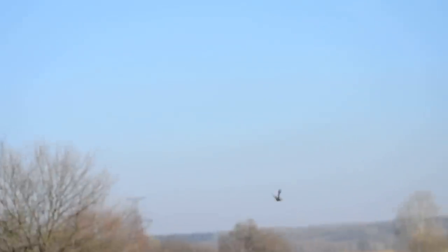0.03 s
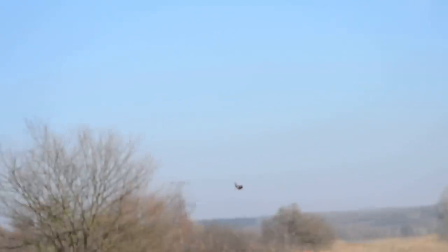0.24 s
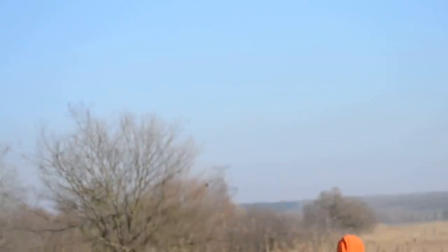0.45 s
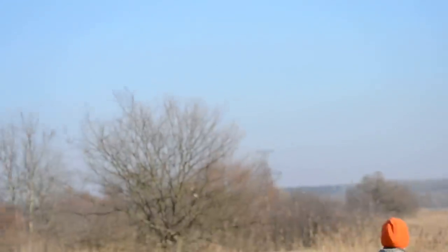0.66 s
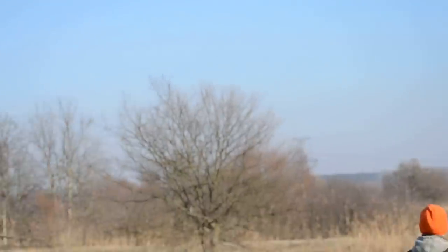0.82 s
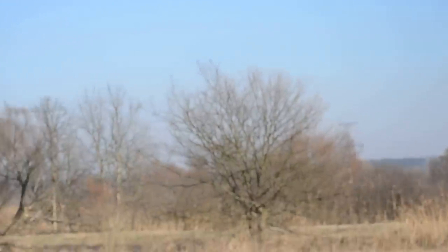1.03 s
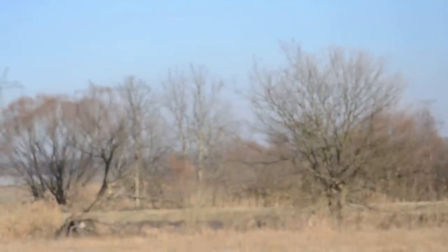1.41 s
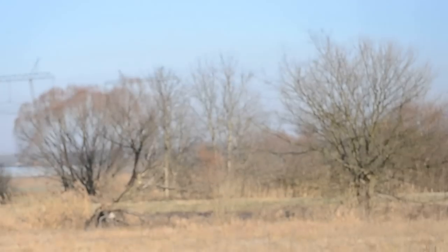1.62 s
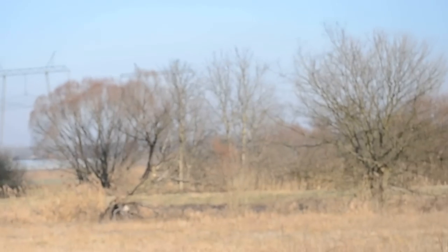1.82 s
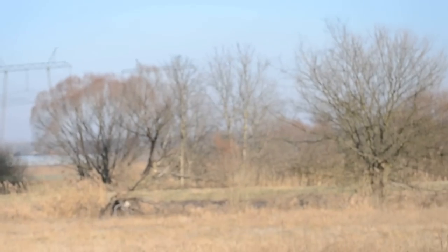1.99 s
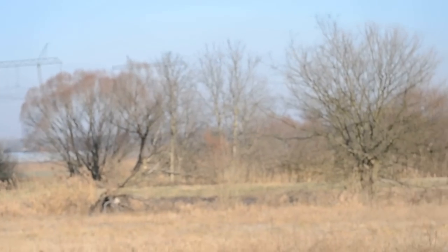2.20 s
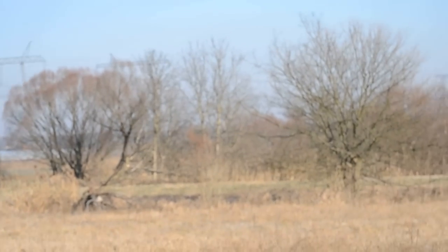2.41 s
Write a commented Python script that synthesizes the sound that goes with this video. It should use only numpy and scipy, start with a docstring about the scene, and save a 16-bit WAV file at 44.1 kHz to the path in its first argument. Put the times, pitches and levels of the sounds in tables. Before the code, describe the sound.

Shotgun blasts ring out over a field, a quick pair then one more, with rolling echoes.

```python
"""Faint wind and ticking dry stalks are heard first, then three shotgun shots over a winter field:
one close by, one at once from a gun farther off, and later the near gun again. Each blast is a brief
pressure pulse that overloads the microphone. Reeds and grass scatter it as a fading hiss over a low
ground rumble, and bushes and tree lines reflect it as slaps and crackling, rolling echoes."""
import sys
import numpy as np
from scipy import signal
from scipy.fft import rfft, irfft
from scipy.io import wavfile

SR = 44100
rng = np.random.default_rng(int(sys.argv[2]) if len(sys.argv) > 2 else 0)


def transcribe(signal):
    """Save signal, clipped to [-1, 1], as a 16-bit WAV file at the path in sys.argv[1]."""
    frames = np.atleast_2d(signal).T
    limited = np.clip(frames, -1, 1)
    pcm = np.round(limited * 32767).astype(np.int16)
    wavfile.write(sys.argv[1], SR, pcm)


N = 112454

# Dry stalks near the microphone: start_s, level_db, decay_s, tilt_db_per_octave
STALK_RUSTLES = [(0.079, -58, 0.0096, -2.5), (.121, -58, 0.0036, -1), (.179, -59, .005, -2),
                 (.193, -57, .003, -1), (.201, -53, 0.0018, 1), (0.778, -36, 0.0025, 9.5),
                 (2.245, -58.5, 0.11, 4), (2.38, -64.5, 0.11, 5), (2.462, -56, .004, 3),
                 (2.512, -51, 0.014, 6.5)]
# Shots: name, start_s, gun, blast_db, decay_s, tilt_db_per_octave, bounce_delay_s,
# reed_gain_db, rumble_gain_db, echo_tilt_db_per_octave
GUNSHOTS = [("first", .2420, "near", 2.5, 0.0034, 0.69, .00162, 0, -6.2, 1),
            ("second", .3282, "far", 4.2, 0.0023, 0, 0.001155, -2.65, 0, 0),
            ("third", 1.2309, "near", 4.6, .0042, -0.37, .00166, 0, -3.8, 0)]
# Envelope of the echo from the woods, by gun: delay_s, level_db
WOODS_ENVELOPES = {"near": [(.1, -37.5), (.25, -49), (.32, -42), (.35, -29.5), (.39, -27), (.46, -29.5),
                   (.54, -35), (.62, -36), (.69, -30.5), (.74, -28.5), (.83, -31.5), (.9, -35.5),
                   (1.0, -37), (1.12, -44.5), (1.32, -49.5)], "far": [(.1, -54), (.28, -67), (.35, -37),
                   (.41, -29), (.5, -34), (.6, -46), (.69, -28.5), (.77, -29), (.87, -30), (1.0, -37),
                   (1.3, -49), (1.7, -65)]}
# Reflections of the farther gun off nearby bushes: start_s, level_db, decay_s, tilt_db_per_octave
BUSH_SLAPS = [(0.335, -8, 0.006, 4.5), (.3405, -6, 0.0022, -3), (0.3462, -1, 0.0015, -0.5)]
# Echoes off single trees and banks, by shot, as aim differs: delay_s, level_db, decay_s, tilt_db_per_octave
TREE_ECHOES = {"first": [(.206, -21.5, 0.003, 6), (.342, -18, 0.0024, 3), (.350, -12.5, 0.0026, -3.5),
               (.374, -15.5, 0.011, -4), (.406, -25.5, 0.0038, -6.5), (.566, -28.5, 0.0058, -3),
               (.638, -19.5, 0.0052, -3), (.663, -26.5, 0.0056, -3.5), (.712, -28.5, 0.027, -4),
               (.735, -23.5, .009, -2)], "second": [(.355, -16.5, .007, 0), (.377, -20, 0.0054, -4.5),
               (.408, -23, 0.0051, -0.5), (.723, -20, 0.0084, -2.5), (.738, -20.5, 0.012, -2.5),
               (.752, -22.5, .025, -4), (.785, -24.5, 0.013, -2.5)], "third": [(.208, -32, 0.0054, 5),
               (.341, -20.5, 0.0065, 1.5), (.350, -13, 0.0046, -1), (.375, -16.5, 0.0071, -3),
               (.405, -21, 0.015, -3), (.565, -24, .011, -4), (.636, -21.5, 0.012, -3.5),
               (.663, -27, 0.0081, -0.5), (.712, -24.5, .02, -2), (.724, -24, 0.017, -2.5),
               (.851, -27, 0.011, 0), (.893, -31.5, 0.043, 0.5), (1.162, -38.5, 0.012, -0.5),
               (1.236, -31.5, 0.0057, -2)]}
# Spectra of the sources and echoes: frequency_hz, relative_level_db
WIND_SPECTRUM = [(25, -33), (70, 1), (250, -11.5), (600, 3), (1100, 1), (2500, -8.5), (5000, -18.5),
                 (9500, -19), (12000, -38)]
REED_SPECTRUM = [(60, -38), (150, -5.5), (350, -2), (600, 2.5), (800, -3), (1150, -0.5), (2200, -2.5),
                 (5000, -5), (9000, -6), (12000, -21)]
BLAST_SPECTRA = {"near": [(40, -22), (150, -12), (280, -9.5), (420, -4), (620, -1.5), (880, -2.5),
                 (1200, -0.5), (2600, -4.5), (4500, -16), (9000, -22), (12000, -28)], "far": [(40, -20),
                 (150, -17.5), (300, -14), (500, 1), (750, 3), (1100, -4), (2000, -5.5), (4000, -27),
                 (9000, -12.5), (12000, -36)]}  # by gun
GROUND_SPECTRUM = [(30, -54), (80, -21.5), (130, -6), (190, 6.5), (260, -3.5), (400, -33), (1000, -33)]
NEAR_ECHO_SPECTRUM = [(30, -79), (110, -25), (250, -33.5), (400, -12.5), (600, -0.5), (1100, 2), (2200, -4),
                      (4000, -15), (6500, -24), (8000, -26.5), (9300, -25), (12000, -47)]
FAR_ECHO_SPECTRUM = [(30, -44), (110, -32.5), (220, -37.5), (400, -5.5), (600, 4), (1200, 2), (2000, -4),
                     (3200, -18.5), (5500, -29), (8000, -35.5), (9300, -33), (12000, -70.5)]


def undb(db):
    """Amplitude grows tenfold for every 20 decibels."""
    return 10 ** (np.asarray(db) / 20)


def colour(x, spectrum, tilt=0):
    """A minimum-phase filter of unit power imposes a spectrum, tilted in dB per octave about 1 kHz."""
    size = 8192
    bin_hz = np.arange(size // 2 + 1) * SR / size
    octave = np.log2(np.maximum(bin_hz, 1) / 1000)
    hz, db = np.array(spectrum, float).T
    gain = undb(np.interp(octave, np.log2(hz / 1000), db) + tilt * octave)
    cepstrum = irfft(np.log(gain))
    cepstrum[1:size // 2] *= 2  # folding onto positive time makes the filter causal
    cepstrum[size // 2 + 1:] = 0
    response = irfft(np.exp(rfft(cepstrum)))
    return signal.fftconvolve(x, response / np.linalg.norm(response))[:N]


def age(start_s):
    """Time in seconds since an onset, negative before it."""
    return np.arange(N) / SR - start_s


def wander(steps_per_s):
    """Random modulation: levels joined by straight lines, with a spread near 1."""
    steps = np.clip(rng.standard_normal(2000), -2, 2)
    return 1.2 * np.interp(age(0) * steps_per_s, np.arange(len(steps)), steps)


def burst(t, decay_s, hold_s=0, rise_s=1e-5):
    """A broadband transient: pressure spikes of random sign rise, hold and decay exponentially."""
    envelope = np.exp(np.minimum(t, 0) / rise_s - np.maximum(t - hold_s, 0) / decay_s)
    return rng.choice([-1, 1], N) * envelope


def scatter(per_s, spread_db):
    """Incoherent arrivals: impulses of random time, sign and size, scaled to rms 1."""
    impulses = rng.choice([-1, 1], N) * (rng.random(N) < per_s / SR)
    impulses = impulses * undb(spread_db * np.minimum(rng.exponential(size=N), 5))
    return impulses / np.std(impulses)


def wind():
    """Turbulence: air moving through dry grass makes faint noise whose level wavers."""
    level_db = -60.5 + 1.2 * wander(steps_per_s=6)
    return undb(level_db) * colour(rng.standard_normal(N), WIND_SPECTRUM)


def stalks():
    """Impulsive excitation: each rustle of a dry stalk is a decaying cluster of tiny clicks."""
    out = np.zeros(N)
    for start_s, db, decay_s, tilt in STALK_RUSTLES:
        clicks = burst(age(start_s), decay_s, rise_s=.001) * scatter(per_s=6000, spread_db=2.1)
        out += undb(db) * colour(clicks, REED_SPECTRUM, tilt)
    return out


def muzzle_blast(t, gun, decay_s, tilt, bounce_s):
    """Interference: the pressure pulse and its delayed ground reflection sum to a hollow sound."""
    direct = colour(burst(t, decay_s, hold_s=.0023), BLAST_SPECTRA[gun], tilt)
    reflected = undb(-6) * np.interp(t - bounce_s, t, direct)
    return direct + reflected


def reed_hiss(t):
    """Scattering: nearby reeds and grass spread the blast into a hiss that swells briefly and fades."""
    peak_s, swell_db, fall_db_per_s = .038, 2.5, 146
    swell = undb(-swell_db * np.clip(1 - t / peak_s, 0, 1))
    fade = undb(-18 - fall_db_per_s * np.maximum(t - peak_s, 0))
    reflections = scatter(per_s=9000, spread_db=-.14) * (t > 0)
    return colour(reflections * swell * fade, REED_SPECTRUM)


def ground_rumble(t):
    """Ground wave: low frequencies travel along the surface and linger, decaying at two rates."""
    rise_s, fast_db_per_s, slow_db_per_s = .014, 62, 30.5
    t = np.maximum(t, 0)
    rise = 1 - np.exp(-t / rise_s)
    fade = undb(-43.5 - fast_db_per_s * t) + undb(-42.5 - slow_db_per_s * t)
    return colour(rng.standard_normal(N) * rise * fade, GROUND_SPECTRUM)


def farness(delay_s):
    """Delay grows with path length: 0 for a near reflector, rising to 1 for a far one."""
    near_s, far_s = .35, .86
    return np.clip((delay_s - near_s) / (far_s - near_s), 0, 1)


def woods_roll(t, gun, tilt):
    """Diffuse reflection: clumps of trunks roll the shot back, duller as the path lengthens."""
    delay_s, db = np.array(WOODS_ENVELOPES[gun]).T
    trunks = scatter(per_s=2500, spread_db=1) * (t > 0)
    clumps_db = 2 * wander(steps_per_s=220)
    roll = trunks * undb(np.interp(t, delay_s, db) + clumps_db)
    near = colour(roll * (1 - farness(t)), NEAR_ECHO_SPECTRUM, tilt)
    far = colour(roll * farness(t), FAR_ECHO_SPECTRUM, tilt)
    return near + far


def bush_slaps():
    """Early reflection: nearby bushes return hard slaps just after the farther gun."""
    return sum(undb(db) * colour(burst(age(start_s), decay_s), NEAR_ECHO_SPECTRUM, tilt)
               for start_s, db, decay_s, tilt in BUSH_SLAPS)


def tree_echoes(t, shot, shot_tilt):
    """Discrete reflection: each large face of a tree or bank returns one delayed slap."""
    out = np.zeros(N)
    for delay_s, db, decay_s, face_tilt in TREE_ECHOES[shot]:
        spectrum = FAR_ECHO_SPECTRUM if farness(delay_s) > .8 else NEAR_ECHO_SPECTRUM
        slap = burst(t - delay_s, decay_s, rise_s=.0023)
        out += undb(db) * colour(slap, spectrum, shot_tilt + face_tilt)
    return out


def scene():
    """Superposition: wind, stalks and every shot with its hiss, rumble and echoes add in one channel."""
    out = wind() + bush_slaps() + stalks()
    for shot, start_s, gun, blast_db, decay_s, tilt, bounce_s, reed_db, rumble_db, echo_tilt in GUNSHOTS:
        t = age(start_s)
        out += undb(blast_db) * muzzle_blast(t, gun, decay_s, tilt, bounce_s)
        out += undb(reed_db) * reed_hiss(t)
        out += undb(rumble_db) * ground_rumble(t)
        out += woods_roll(t, gun, echo_tilt)
        out += tree_echoes(t, shot, echo_tilt)
    return out[None]


def record(dry):
    """Saturation: the microphone loses the top octave and clips the blasts; low-passes round the edges."""
    microphone_hz, overload, edge_hz, top_hz = 10700, .64, 14150, 16000
    heard = signal.sosfilt(signal.cheby1(10, .3, microphone_hz, fs=SR, output="sos"), dry)
    clipped = np.clip(heard, -overload, overload)
    rounded = signal.sosfilt(signal.butter(2, edge_hz, fs=SR, output="sos"), clipped)
    return signal.sosfilt(signal.ellip(8, .2, 70, top_hz, fs=SR, output="sos"), rounded)


dry = scene()
out = record(dry)
transcribe(out)
```